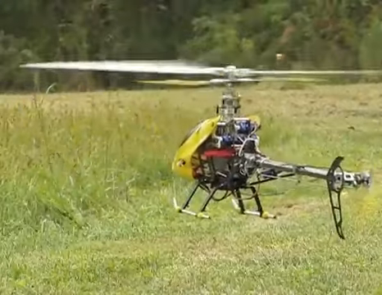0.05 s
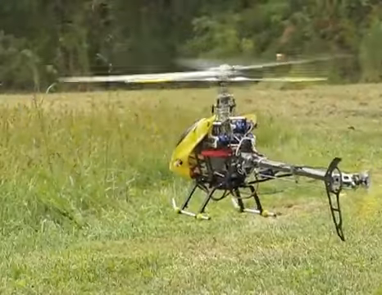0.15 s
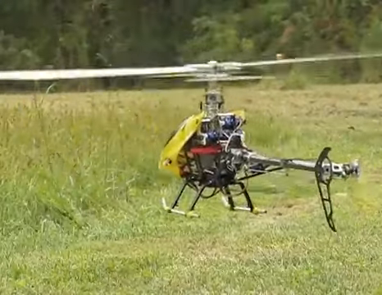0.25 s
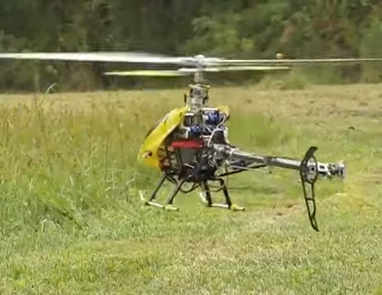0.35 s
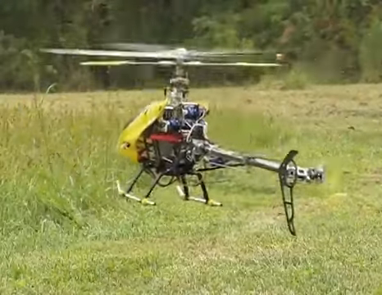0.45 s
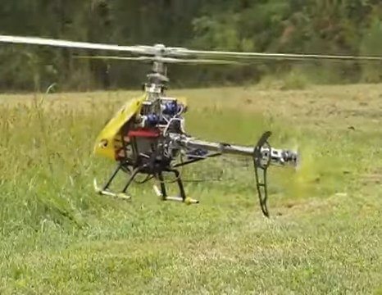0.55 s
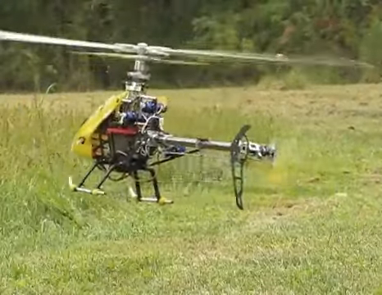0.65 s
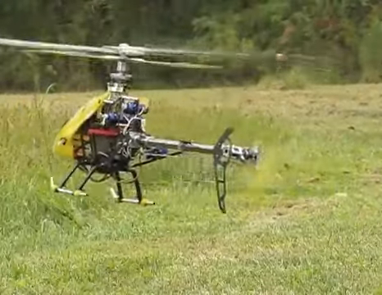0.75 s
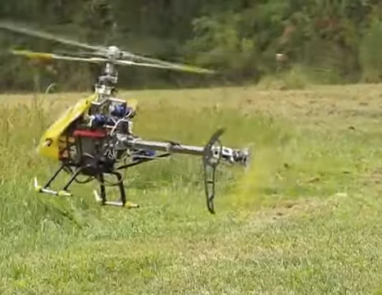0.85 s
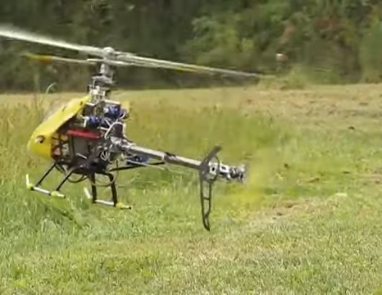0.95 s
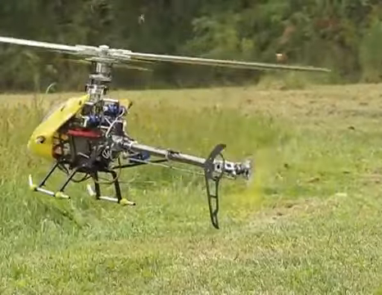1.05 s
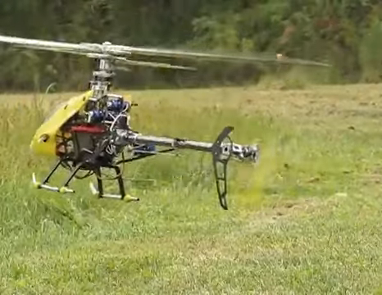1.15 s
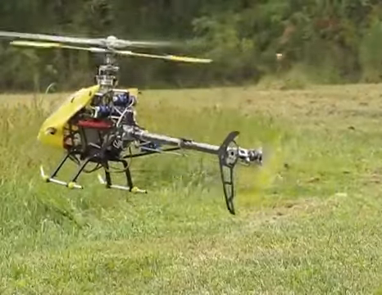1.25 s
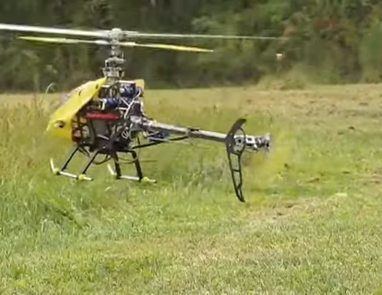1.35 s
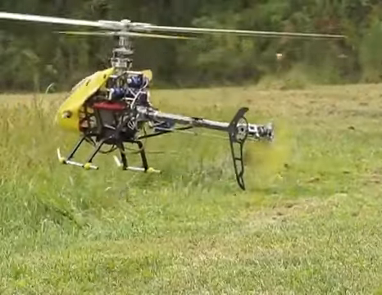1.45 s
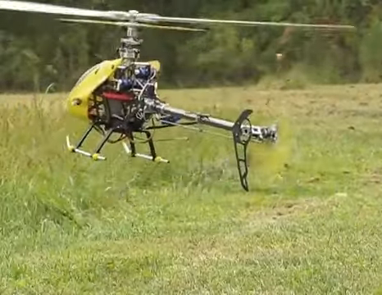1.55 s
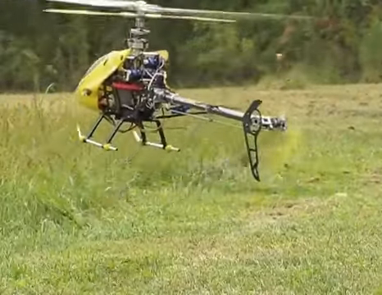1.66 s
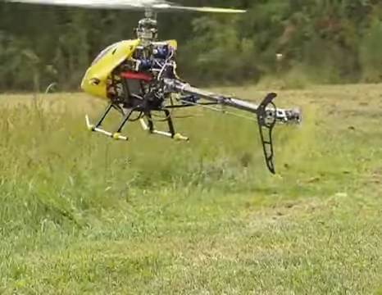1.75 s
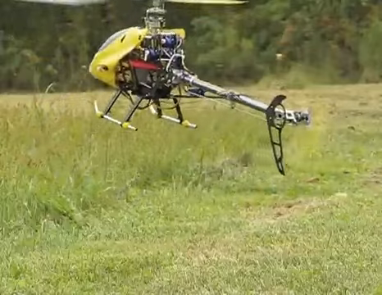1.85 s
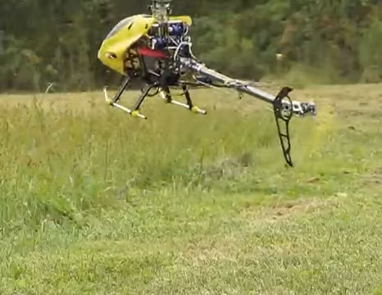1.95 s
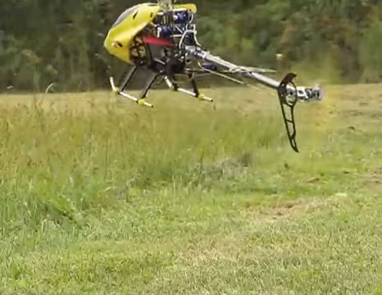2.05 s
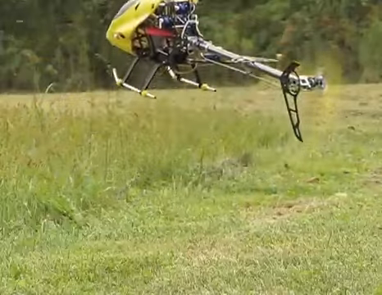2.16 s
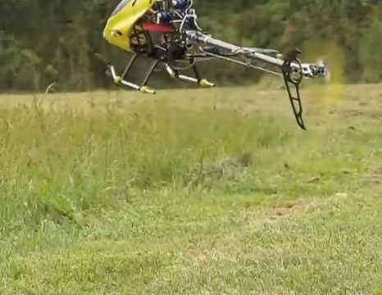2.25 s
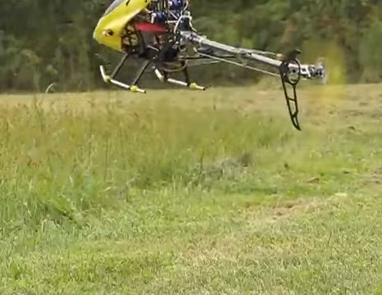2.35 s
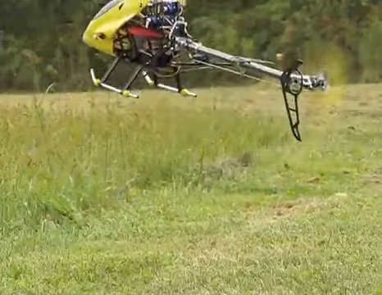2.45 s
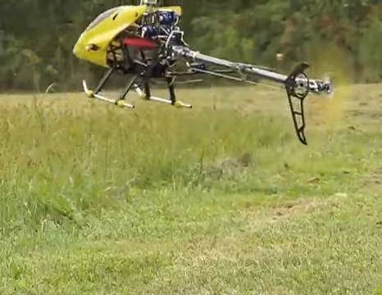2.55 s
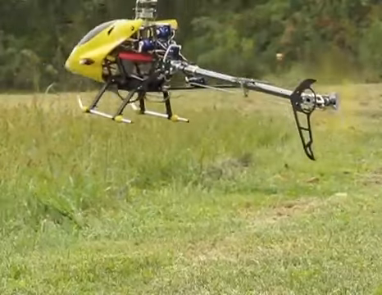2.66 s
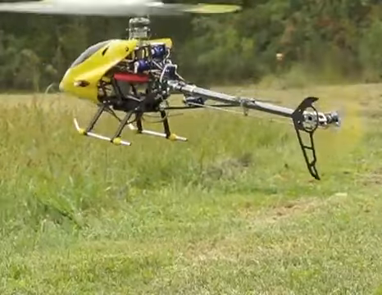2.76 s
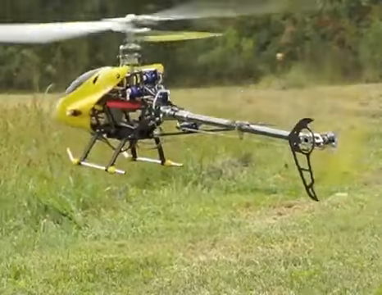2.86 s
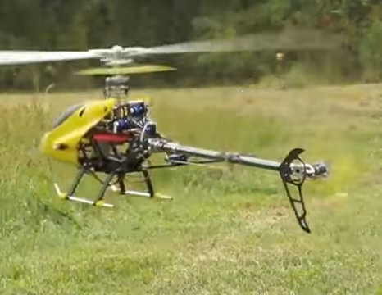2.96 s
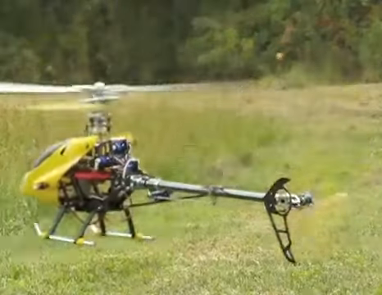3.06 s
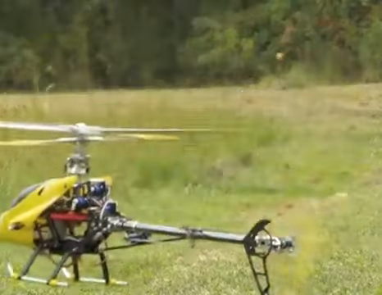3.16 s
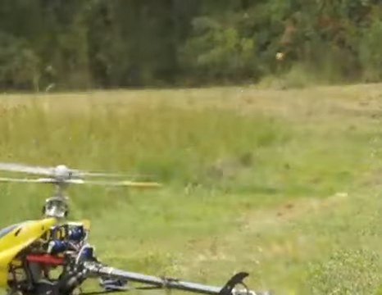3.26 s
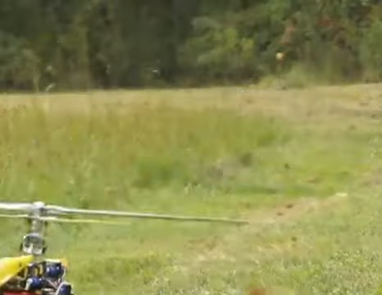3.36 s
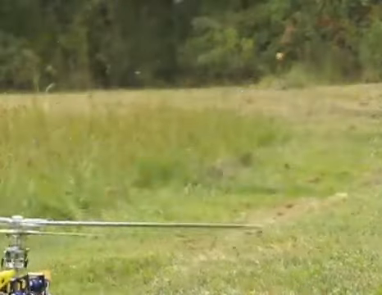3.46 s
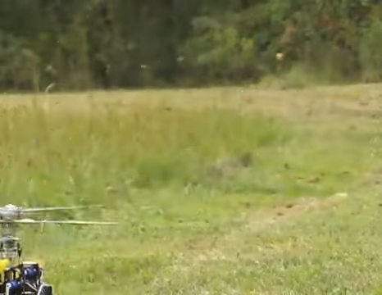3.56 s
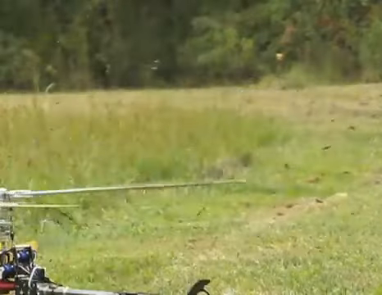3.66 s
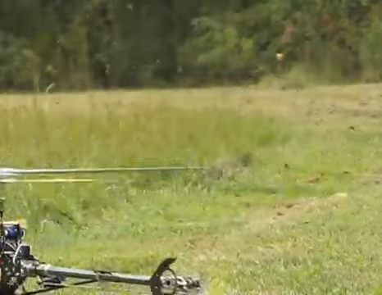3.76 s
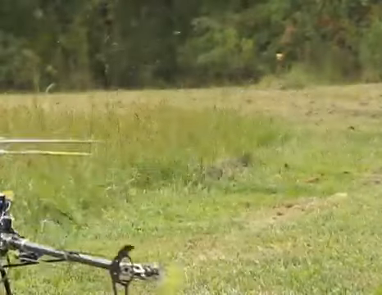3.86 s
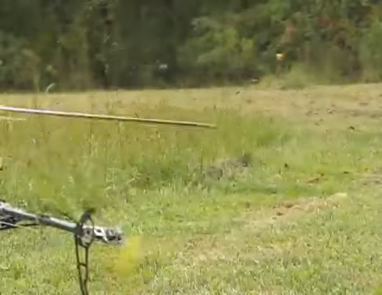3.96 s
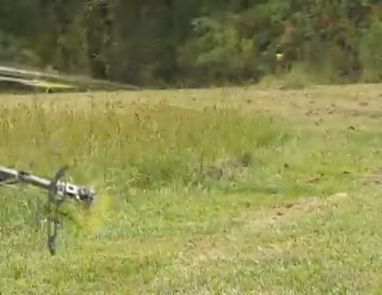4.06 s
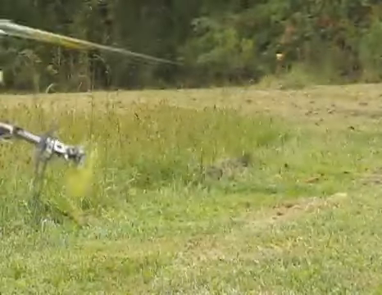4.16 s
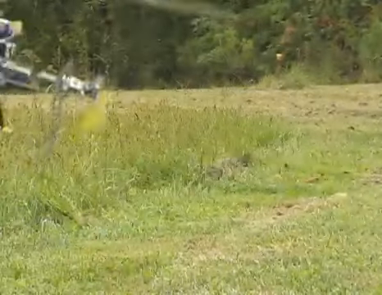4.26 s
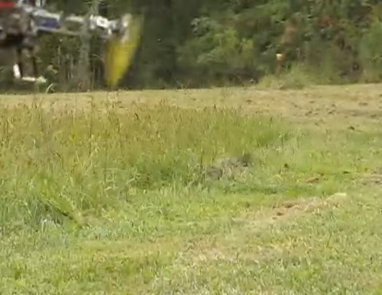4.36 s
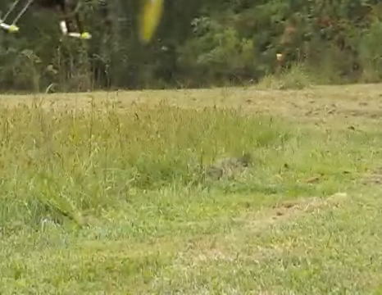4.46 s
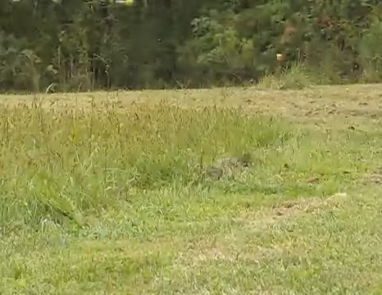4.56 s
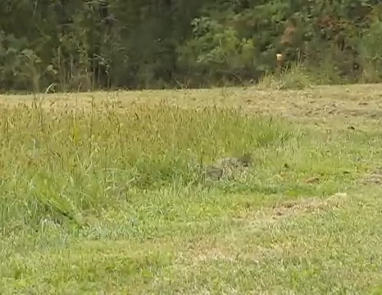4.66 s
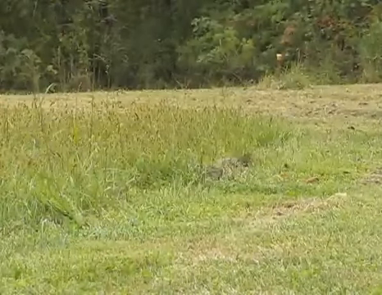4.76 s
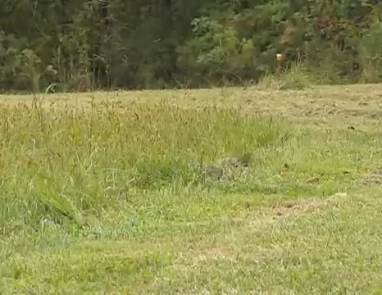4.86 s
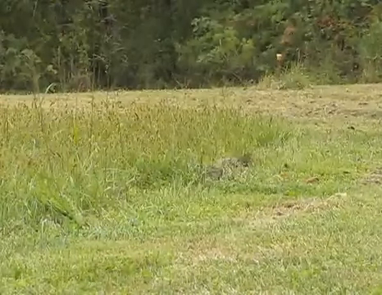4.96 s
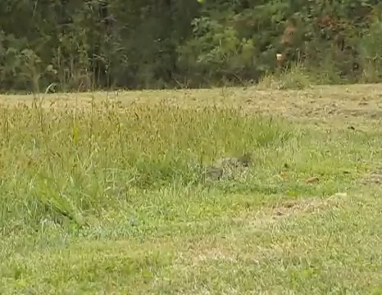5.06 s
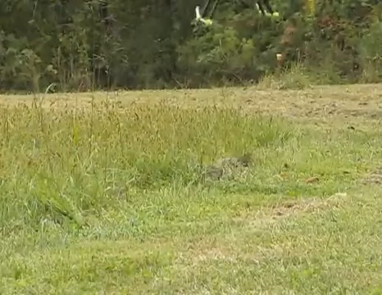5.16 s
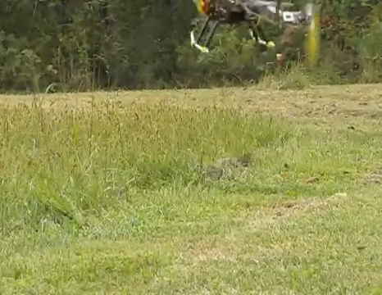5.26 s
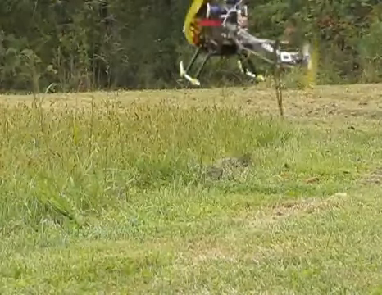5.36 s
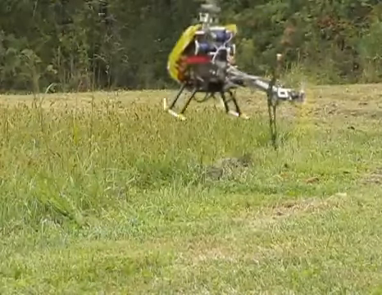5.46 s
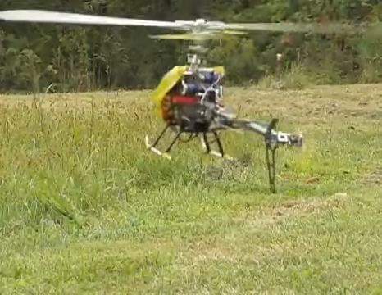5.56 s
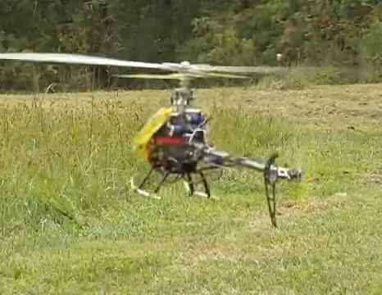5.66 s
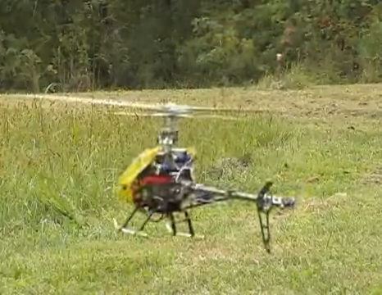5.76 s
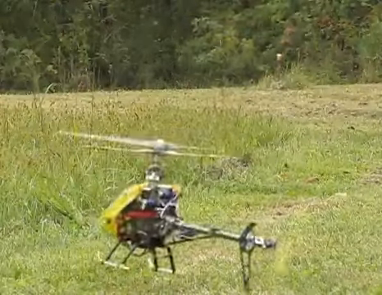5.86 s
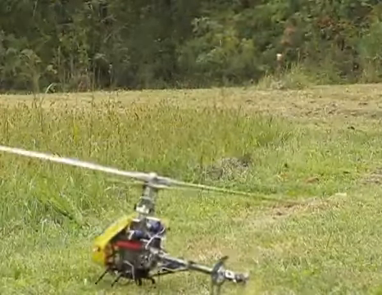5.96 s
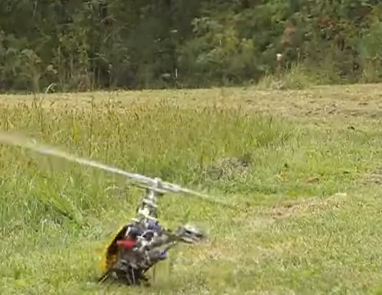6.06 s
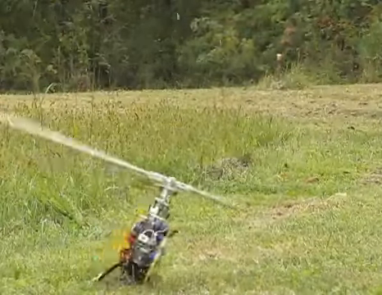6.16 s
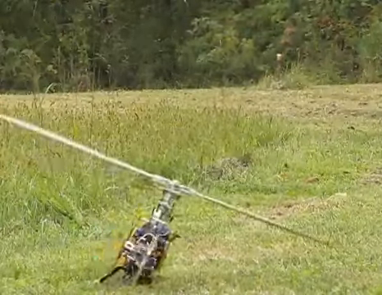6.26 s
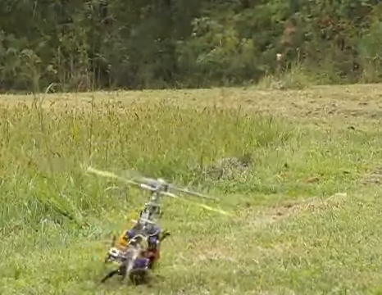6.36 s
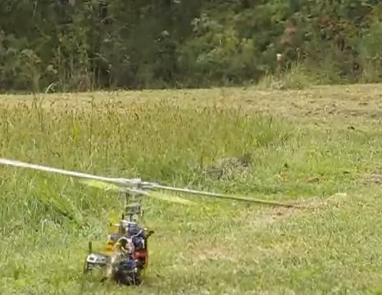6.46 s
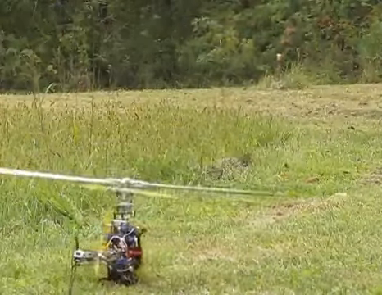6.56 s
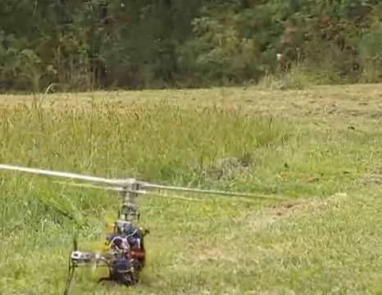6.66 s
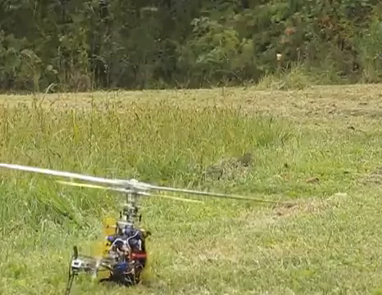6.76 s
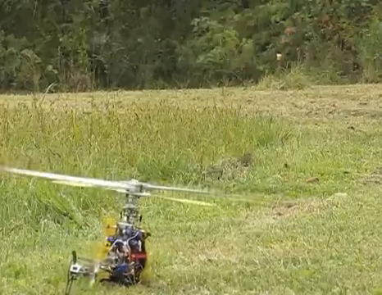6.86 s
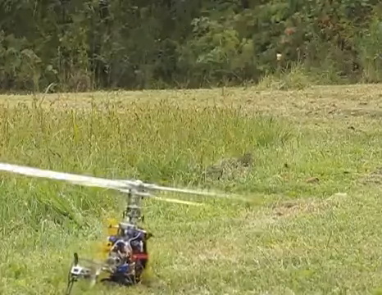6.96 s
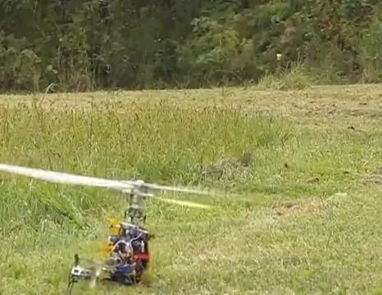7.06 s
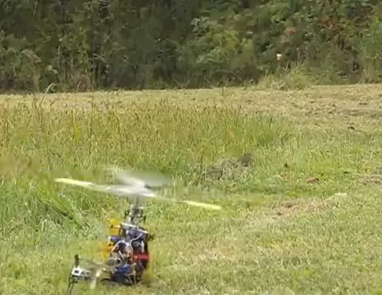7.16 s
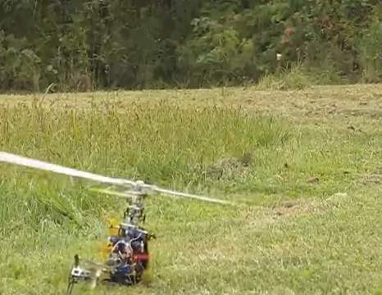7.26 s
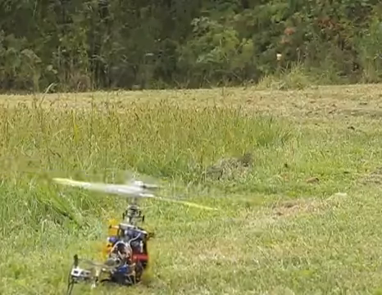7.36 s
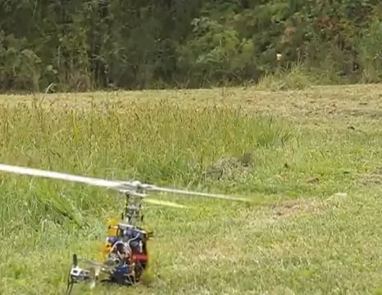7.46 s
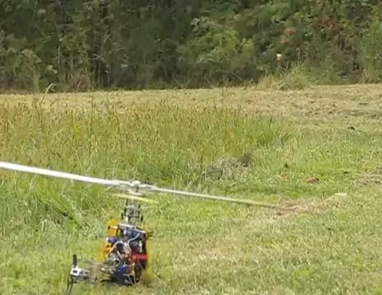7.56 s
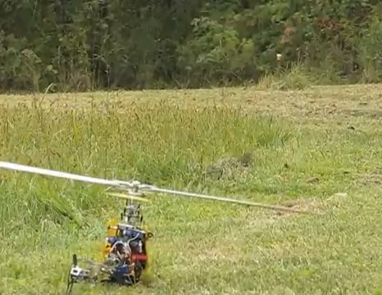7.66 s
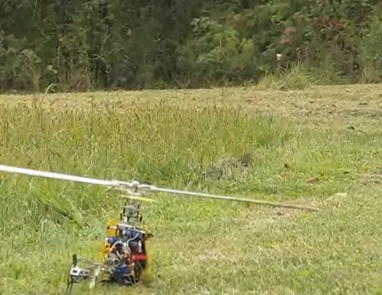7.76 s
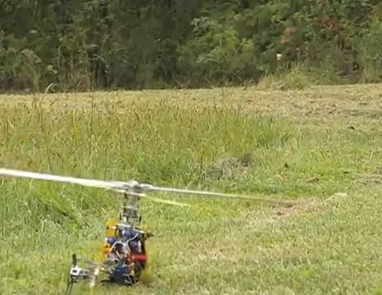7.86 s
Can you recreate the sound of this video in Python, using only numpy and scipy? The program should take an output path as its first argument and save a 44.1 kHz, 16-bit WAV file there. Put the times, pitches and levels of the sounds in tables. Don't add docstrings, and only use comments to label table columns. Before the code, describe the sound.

A small electric model helicopter whines and throbs over hissing blades, drops into grass with sharp snaps, then winds down to insects and cricket chirps.

```python
import sys
import numpy as np
from scipy import signal
from scipy.fft import rfft, irfft, next_fast_len
from scipy.io import wavfile
from scipy.ndimage import uniform_filter1d, map_coordinates

SR = 44100
rng = np.random.default_rng(int(sys.argv[2]) if len(sys.argv) > 2 else 0)


def rack_gain(trim_db):
    fader = np.asarray(trim_db, float)
    return 10 ** (fader / 20)


def output_pcm(signal):
    pcm = np.clip(np.atleast_2d(signal).T, -1, 1) * 32767
    wavfile.write(sys.argv[1], SR, np.round(pcm).astype(np.int16))


N = 348831
T = np.arange(N) / SR
HZ = np.fft.rfftfreq(512, 1 / SR)
FRAME_S = np.arange(N // 128 + 5) * 128 / SR


def evened(x):
    return x / np.sqrt(np.mean(x ** 2) + 1e-20)


def read(points, hz):
    f, value = np.transpose(points)
    return np.interp(np.log(hz + 1), np.log(f + 1), value)


def curves(rows, t):
    s, *columns = np.transpose(rows)
    return np.array([np.interp(t, s, column) for column in columns])


def drift(rate_hz):
    coarse_hz = 400
    coarse = np.r_[0, rng.standard_normal(int(N / SR * coarse_hz) + 2)]
    lowpass = signal.butter(2, min(rate_hz, 190), fs=coarse_hz, output="sos")
    smooth = signal.sosfiltfilt(lowpass, coarse, padtype=None)
    return np.interp(T * coarse_hz, np.arange(len(coarse)), evened(smooth))


def noise(field_db, same, lean_db=0):
    a, b, c, d = rng.standard_normal((N // 128 + 5, 257, 4), np.float32).T
    left = a + 1j * b
    other = c + 1j * d
    same = np.clip(same, -1, 1)[:, None]
    lean = rack_gain(lean_db / 2 + 0 * same)[:, None] if np.ndim(same) == 1 else rack_gain(
        np.broadcast_to(lean_db, len(same)) / 2)[:, None]
    right = same * left + np.sqrt(1 - same ** 2) * other
    z = np.array([left * lean, right / lean]) * rack_gain(field_db)
    return signal.istft(z.astype(np.complex64), nperseg=512, noverlap=384)[1][:, :N]


def add(mix, s, sound):
    part = mix[:, round(s * SR):][:, :sound.shape[1]]
    part += sound[:, :part.shape[1]]


# (frequency [Hz], density [dB per Hz])
WASH_COLOUR = [(20, 5), (70, 0), (200, -8.5), (450, -14.5), (1300, -16.5), (4000, -20.5), (9500, -20),
               (11000, -22), (16000, -22.5)]
# (centre [Hz], width [Hz], level [dB])
CHORUS = [
    (7560, 650, -35),
    (9100, 930, -48.5),
    (4660, 370, -49),
    (3150, 150, -53),
]


def meadow():
    wash = rack_gain(-45) * evened(noise(read(WASH_COLOUR, HZ)[:, None] + 0 * FRAME_S, 0.87 + 0 * HZ))
    song = sum(rack_gain(db - 9.5 * ((HZ[:, None] - hz) / width) ** 2) for hz, width, db in CHORUS)
    chorus = evened(noise(20 * np.log10(song + 1e-9) + 0 * FRAME_S, 0.077 + 0 * HZ, -1.6))
    shimmer_db = 0.58 * drift(50) + 1.0 * drift(1.4)
    return wash + rack_gain(CHORUS[0][2] + shimmer_db) * chorus


# (start [s], pulses [count], first pulse [dB], swell [dB per pulse])
CHIRPS = [
    (6.942, 4, -35, -3),
    (7.187, 4, -39.5, 2.5),
    (7.466, 4, -48, 2),
    (7.79, 3, -40, 3.5),
]


def cricket(pulse_s=0.024, rough=0.4, scrape=2.5, uneven_s=0.0018, uneven_hz=30):
    pitch_hz, pulse_gap_s = 4590, 0.0434
    out = np.zeros((2, N))
    t = np.arange(round(pulse_s * SR)) / SR
    teeth = uniform_filter1d(rng.standard_normal(N), size=60)
    rasp = 1 + rough * drift(180) + scrape * teeth
    for s, pulses, db, swell_db in CHIRPS:
        for k, (late, sharp) in enumerate(rng.standard_normal((round(pulses), 2))):
            tone = np.sin(2 * np.pi * (pitch_hz + uneven_hz * sharp) * t * (1.008 - 0.37 * t))
            pulse = np.hanning(len(t)) * tone
            level = rack_gain(db + k * swell_db - 1.5)
            add(out, s - .005 + k * pulse_gap_s + uneven_s * late, level * pulse * rack_gain([[-1.4], [1.4]]))
    return out * rasp


# (time [s], peak [dB], centre [Hz], left-right [dB])
SNAPS = [
    (0.1607, -8, 8150, 1.2),
    (0.3007, -4.5, 6000, -1),
    (6.0708, -14.5, 3000, -1),
    (6.3233, -7, 7260, -4),
    (6.378, -26, 4520, -.4),
    (6.5, -10.5, 6700, -1.8),
    (6.574, -28, 3485, 2),
    (6.634, -23.5, 3490, .3),
    (6.8667, -12.5, 6500, 4),
    (6.868, -21, 5200, -9),
]
# (start [s], end [s], first pitch [Hz], last pitch [Hz], level [dB])
SQUEAK = (6.605, 6.72, 10600, 9800, -42)
# (time [s], level [dB])
RUSTLE = [
    (6.532, -38),
    (6.57, -46),
    (6.612, -46.5),
    (6.66, -50),
    (6.77, -45),
    (6.823, -40),
    (6.866, -36),
    (6.914, -40),
    (6.99, -45),
    (7.04, -52),
]


def grass():
    out = np.zeros((2, N))
    t = np.arange(-44, 220) / SR
    for s, db, hz, pan in SNAPS:
        ringing = 0.03 * np.exp(-t / 0.00079) * (t > 0)
        snap = np.sin(2 * np.pi * hz * t) * (np.exp(-(1.9 * hz * t) ** 2) + ringing)
        add(out, s - .001, rack_gain(db + 4.5) * snap * rack_gain([[pan / 2], [-pan / 2]]))
    start, end, hz0, hz1, db = SQUEAK
    glide = np.linspace(hz0, hz1, round((end - start) * SR))
    squeak = np.sin(2 * np.pi * np.cumsum(glide) / SR) * signal.windows.tukey(len(glide), .35)
    add(out, start, rack_gain(db) * squeak * np.ones((2, 1)))
    swish = evened(noise(-12 * ((HZ[:, None] - 14200) / 800) ** 2 + 0 * FRAME_S, 0.88 + 0 * HZ))
    return out + swish * sum(rack_gain(db) * np.exp(-((T - s) / .0055) ** 2) for s, db in RUSTLE)


POWER_OFF_S = 6.3
COAST_HZ, COAST_S = 433.4, 1.45
# (time [s], speed [Hz])
SPEED = [(0, 476.7), (.42, 474.5), (.62, 470), (.9, 467.9), (1.5, 465.9), (1.78, 466.7), (2.0, 464.6),
         (2.3, 467.6), (2.85, 464.3), (3.2, 464.6), (3.58, 477.6), (3.8, 474), (4.02, 476), (4.38, 474.3),
         (4.78, 460), (5.4, 453.3), (5.93, 467.5), (6.28, 442)]


def shaft_hz(t):
    free = COAST_HZ * np.exp((POWER_OFF_S - t) / COAST_S)
    return np.where(t < POWER_OFF_S, curves(SPEED, t)[0], free)


GEAR, TAIL = 15, 7.3
SHAFT = 2 * np.pi * np.cumsum(shaft_hz(T)) / SR
ROTOR = SHAFT / GEAR


def coast(t, let_go_s=0.031):
    off = np.clip((t - POWER_OFF_S) / let_go_s + .5, 0, 1)
    return off, off * 20 * np.log10(shaft_hz(t) / COAST_HZ)


# (time [s], ground echo lag [ms], blade effort [dB], gear side facing the microphone [dB])
FLIGHT = [(0, .25, 3, 4.5), (.8, 0.26, 2.5, 2), (1.4, 0.26, 2, 5.5), (1.8, .28, 1, 0.5),
          (2.3, 0.34, .5, -0.5), (2.8, 0.29, 2, 1.5), (3.2, 0.23, 2, 4.5), (3.42, 0.14, 1, -1),
          (3.6, 0.15, -1, -1.5), (4.0, .23, 0, 5), (4.4, 0.36, 0.5, -4), (4.85, 0.5, -1, -6),
          (5.2, 0.37, -1, -11), (5.55, 0.31, -0.5, -5), (5.85, 0.16, 0.5, 3.5), (6.02, 0.13, -3.5, -3.5),
          (6.12, .14, -2.5, -6), (6.3, 0.16, -3.5, -10)]
# (frequency [Hz], density [dB per Hz])
HISS_COLOUR = [(30, -89), (100, -63.5), (160, -58), (320, -64), (700, -60), (1150, -55.5), (1650, -55),
               (2600, -54), (3600, -52.5), (5500, -53.5), (7300, -55.5), (9000, -53.5), (11000, -59),
               (14000, -57)]
# (frequency [Hz], share [dB per dB])
EFFORT_SHARE = [(850, 0.69), (2800, 1.33), (6300, 0.59), (12500, 1.25)]
# (frequency [Hz], change [dB])
UNLOAD = [(850, -3), (2800, -4.5), (6300, -6.5), (12500, -4.5)]
# (time [s], length [s], treble [dB])
FLARES = [
    (3.41, 0.072, 3),
    (5.916, 0.085, 5),
]
# (frequency [Hz], share [dB per dB])
FLARE_SHARE = [(2500, 0.12), (5500, 0.5), (12000, 1.5)]
# (frequency [Hz], coherence [0-1])
SAME = [(60, 0.87), (120, 1), (240, 1), (480, 0.96), (950, 1), (1890, 1), (3770, 0.79), (7520, 1),
        (15000, 0.98)]
# (frequency [Hz], difference [dB])
LEAN = [(950, 0.0), (1890, 0), (3770, -0.5), (7520, 6), (15000, -1.7)]


def hiss(level_db=-24.0, patchy_db=1.27, turn=0.27, tooth=0.49, grain_db=1.5):
    off, lost_db = coast(FRAME_S)
    effort_db = curves(FLIGHT, FRAME_S)[1]
    flare_db = sum(db * np.exp(-((FRAME_S - s) / length) ** 2) for s, length, db in FLARES)
    shift = np.outer(read(EFFORT_SHARE, HZ), effort_db) + np.outer(read(UNLOAD, HZ), off)
    shift = shift + 1.51 * lost_db + np.outer(read(FLARE_SHARE, HZ), flare_db)
    patches = rng.standard_normal((len(FRAME_S), 257)).T
    patches = evened(uniform_filter1d(uniform_filter1d(patches, 6, 0), 25, 1))
    field_db = read(HISS_COLOUR, HZ)[:, None] + shift + patchy_db * patches
    air = noise(field_db, np.sqrt(np.clip(read(SAME, HZ), 0, 1)), 0.14 * read(LEAN, HZ))
    air = air * rack_gain(level_db) / np.std(air[:, :3 * SR])
    beat = (1 + turn * np.cos(ROTOR - 1.8)) * (1 + tooth * np.cos(SHAFT)) * rack_gain(grain_db * drift(205))
    bright = signal.sosfilt(signal.butter(2, 3200, "high", fs=SR, output="sos"), air)
    return air + bright * (beat - 1)


# (time [s], main blade beat [dB], tail blade beat [dB])
BLADES = [(0.0, -39.5, -45.5), (0.93, -40, -50), (1.92, -48, -44), (2.64, -43, -52), (2.76, -44.5, -44),
          (3.2, -43, -49.5), (3.34, -41, -43), (3.5, -55, -42), (3.73, -45, -46.5), (4.22, -46.5, -42.5),
          (4.34, -45, -48), (5.11, -46.5, -49), (5.16, -58, -46), (5.3, -45.5, -49), (5.72, -42, -41.5),
          (6.28, -46.5, -58.5)]


def blades():
    off, lost_db = coast(T)
    main_db, tail_db = curves(BLADES, T) - off * np.array([[3.5], [6.5]]) + lost_db * np.array([[2.4], [.6]])
    main = np.cos(2 * ROTOR) + 0.2 * np.cos(4 * ROTOR) + 0.032 * np.cos(ROTOR)
    tail = np.cos(TAIL * ROTOR) + 0.21 * np.cos(TAIL * ROTOR / 2)
    return np.sqrt(2) * (rack_gain(main_db + 1.7 * drift(8)) * main + rack_gain(tail_db + 2.0 * drift(42)) * tail)


TOUCHDOWN_S = 6.08
# (shaft order [-], level [dB])
ORDER_DB = [(1, -42), (2, -44), (3, -40), (4, -37.5), (5, -40.5), (6, -109), (7, -39.5), (8, -46), (9, -33),
            (10, -26.5), (11, -41), (12, -59), (13, -59), (14, -42), (15, -57), (16, -45.5), (17, -41.5),
            (18, -39), (19, -38), (20, -36.5), (21, -41), (22, -49), (23, -64), (24, -44.5), (25, -44.5),
            (26, -36.5), (27, -40), (28, -55), (29, -48), (30, -46)]
DRIVE = (232, 247, 281, 292, 308, 323, 337, 442, 458)
DRIVE_DB = (-7, -11, 0, -5, -10.5, -9, -15, -12.5, 1)
# (frequency [Hz], lead [rad])
LEAD = [(0, 0), (2930, -0.023), (4220, 0.74), (5250, 0.14), (7320, 0.39), (11300, -0.071), (12100, -1.2),
        (12700, -0.019), (16500, -0.0)]


def order_shift_db(k, flight, coasting, landed, flutter):
    lag_ms, effort_db, facing_db = flight
    off, lost_db = coasting
    facing = 1.0 * (k in (10, 11)) + 0.36 * (k in (4, 9)) - 0.05 * (k in (3, 20)) - 0.39 * (k == 5)
    effort = 0.45 + 1.07 * (5 < k < 10 or k > 22)
    quiet_db = off * (8 + 1.5 * (k > 1) + 14 * (k > 3) + 2.3 * flutter)
    grass_db = landed * {1: 2.5, 4: -9, 6: 3, 7: 2.5, 10: -9, 11: -3}.get(k, -1.5)
    height_db = np.log2(lag_ms / 0.31) * {2: 4.5, 3: 3.5, 5: 7.5, 20: 2.5}.get(k, 0)
    shift_db = facing_db * facing + effort_db * effort + 1.4 * lost_db - quiet_db
    return shift_db - 3.2 * (k > 22) + grass_db + height_db


def motor(load=0.94, sway=0.6, high_spot=2.3, wander=0.026, flutter_db=0.5, spread=0.19,
          chatter=0.38, lobes_db=2.0, lopsided=0.23, jolt=1.0):
    slow = slice(None, None, 32)
    flight, coasting = curves(FLIGHT, T[slow]), coast(T[slow])
    landed = np.clip((T[slow] - TOUCHDOWN_S) / 0.08 + .5, 0, 1)
    angle = SHAFT + wander * drift(38)
    flutters = [drift(8.1)[slow] for _ in range(6)]
    chatters = [drift(142)[slow] for _ in range(5)]
    order19_db = dict(ORDER_DB)[19]
    tones = ORDER_DB + [(k / GEAR, db + order19_db) for k, db in zip(DRIVE, DRIVE_DB)]
    out = np.zeros((2, N))
    for j, (k, db) in enumerate(tones):
        shift_db = order_shift_db(k, flight, coasting, landed, flutters[0])
        shift_db = shift_db + lobes_db * (k > 11) * drift(2.2)[slow]
        depth = min(k / 9, 1) ** 2
        turn = ROTOR[slow] + high_spot + 1.34 * rng.standard_normal() * (k != 10)
        load_swing = load * (1 - 0.4 * (k != 10)) * (np.cos(turn) + lopsided * np.sin(2 * turn))
        angle_swing = sway * (k < 12) * np.sin(turn)
        swing = 1 + depth * (load_swing + 1j * angle_swing)
        loose = 1 - 0.2 * (k in (3, 4, 5, 10)) + (k > 22) + jolt * landed * (k > 4) - 0.21 * (k == 10)
        swing = swing * (1 + chatter * loose * (chatters[j % 5] + 1j * chatters[j % 5 - 2]))
        level_db = db + shift_db + flutter_db * flutters[j % 6] * (k != 10)
        swing = swing / np.sqrt(np.mean(abs(swing) ** 2)) * rack_gain(level_db)
        hz = SPEED[0][1] * k
        ports = np.exp(1j * (spread * depth * flutters[j % 5 + 1] + read(LEAD, hz) / 2))
        ports = ports * rack_gain(read(LEAN, hz) / 2)
        wave = ((k * angle + rng.uniform(0, 2 * np.pi)) % (2 * np.pi)).astype(np.float32)
        size = np.repeat(np.array([swing * ports, swing / ports], np.complex64), 32, axis=1)[:, :N]
        out += size.real * np.cos(wave) - size.imag * np.sin(wave)
    return np.sqrt(2) * out


def ground(x, strength, turn_rad, dull_hz):
    size = next_fast_len(N)
    hz = np.fft.rfftfreq(size, 1 / SR)
    turn = np.exp(-1j * turn_rad * hz / (hz + 236))
    turf = strength / (1 + (hz / dull_hz) ** 2) * turn
    echo = irfft(rfft(x, size) * turf, size)
    lag_ms = uniform_filter1d(curves(FLIGHT, T)[0], size=4000)
    at = np.arange(N) - lag_ms * SR / 1000
    return x + np.array([map_coordinates(side, [at], order=3, mode="nearest") for side in echo])


def scene():
    craft = ground(motor(), 0.47, 2.204, 6100) + ground(hiss(), 0.43, 2.13, 3300) + blades()
    return meadow() + cricket() + grass() + craft


def band_limit(x):
    return signal.sosfilt(signal.butter(12, 16920, fs=SR, output="sos"), x)


def record(dry):
    duck_s, duck_db, recover_s = .162, -4.5, 0.25
    gain_db = duck_db * (T > duck_s) * np.exp(-abs(T - duck_s) / recover_s)
    edge = signal.firwin(1023, 15780, window=("kaiser", 9), fs=SR)
    mix = signal.oaconvolve(dry * rack_gain(gain_db), edge[None], "same")
    return band_limit(mix)


dry = scene()
out = record(dry)
output_pcm(out)
```